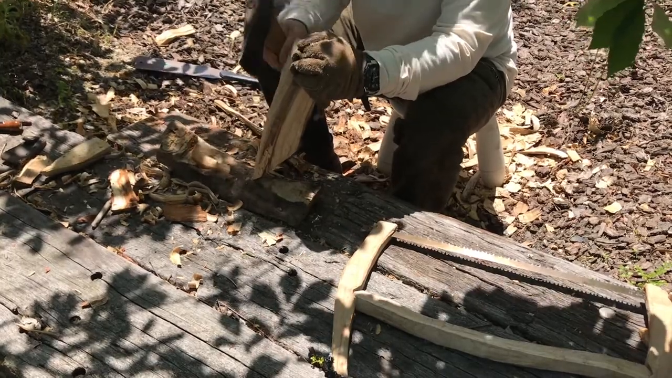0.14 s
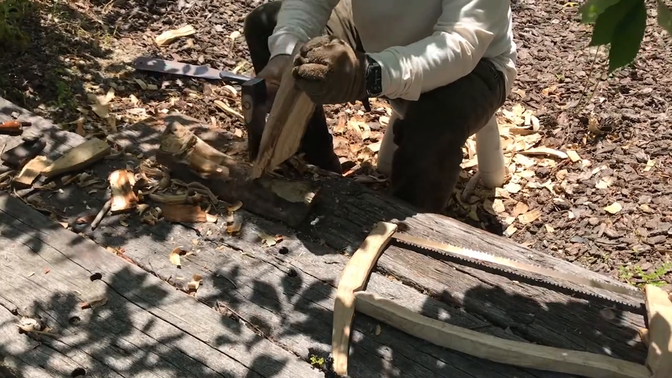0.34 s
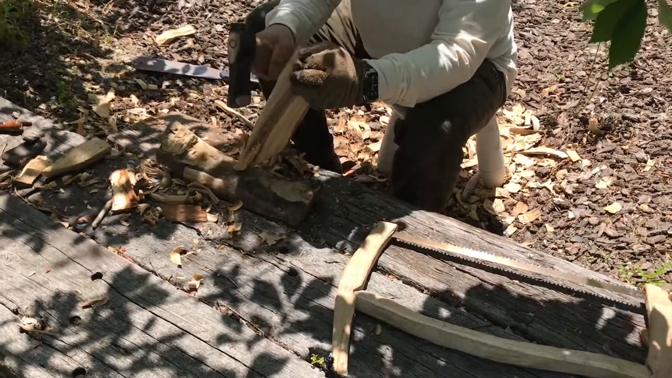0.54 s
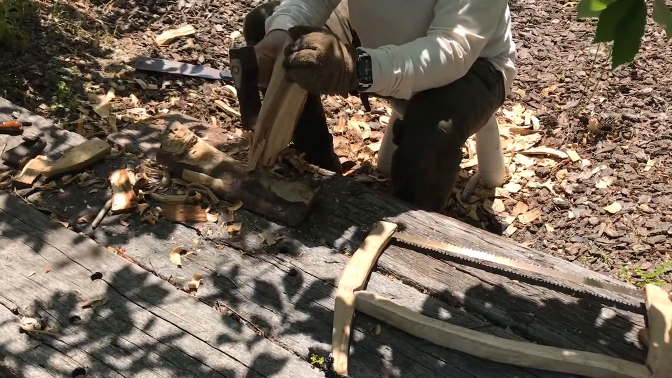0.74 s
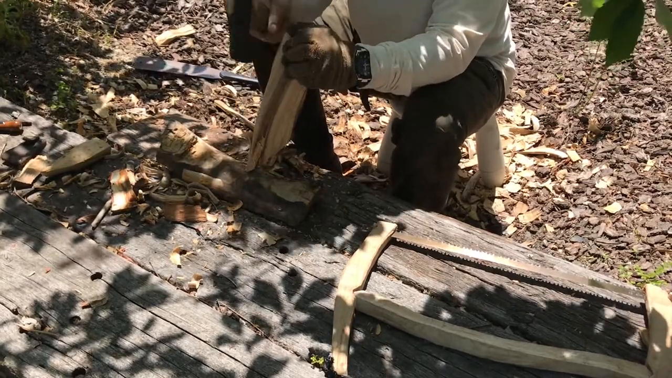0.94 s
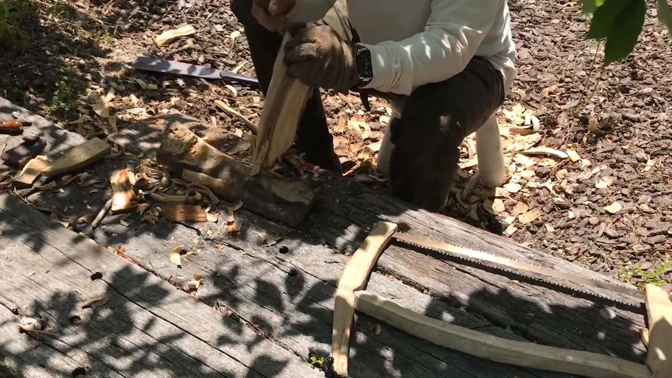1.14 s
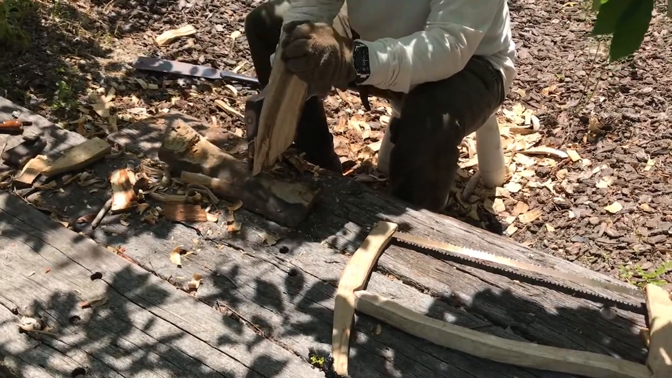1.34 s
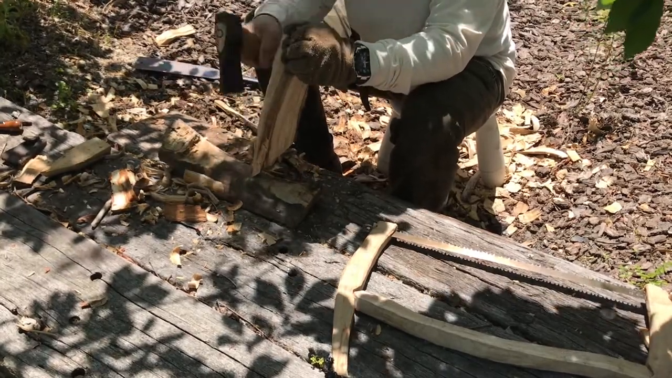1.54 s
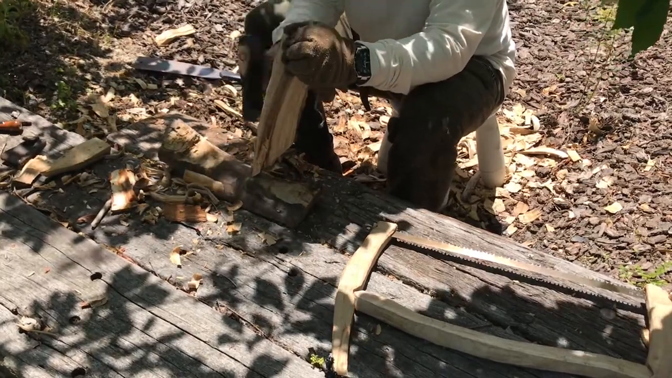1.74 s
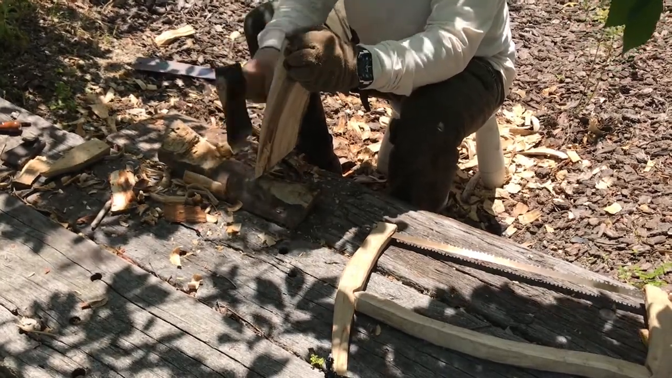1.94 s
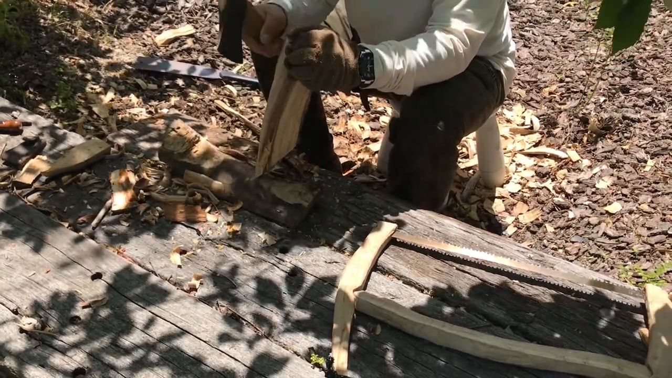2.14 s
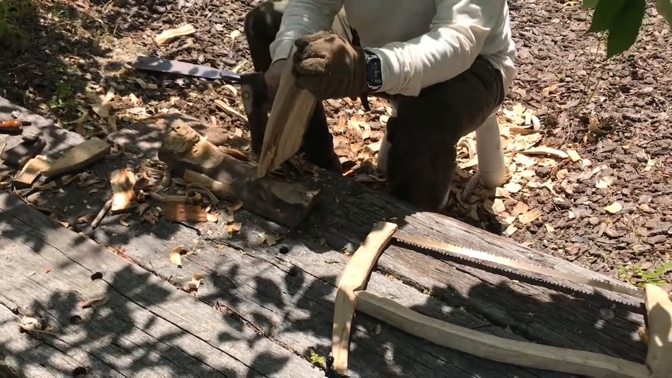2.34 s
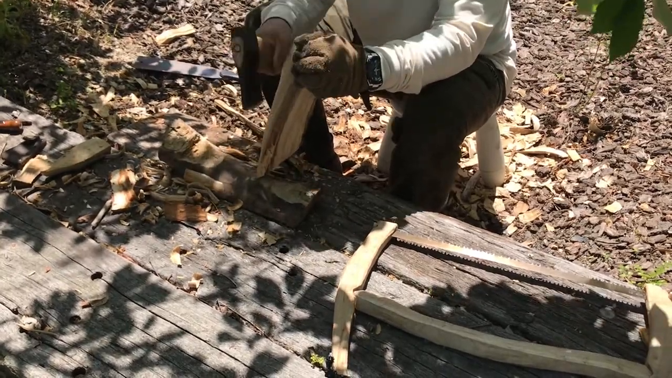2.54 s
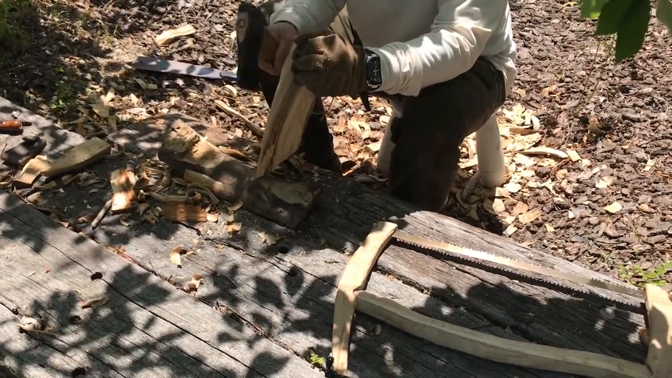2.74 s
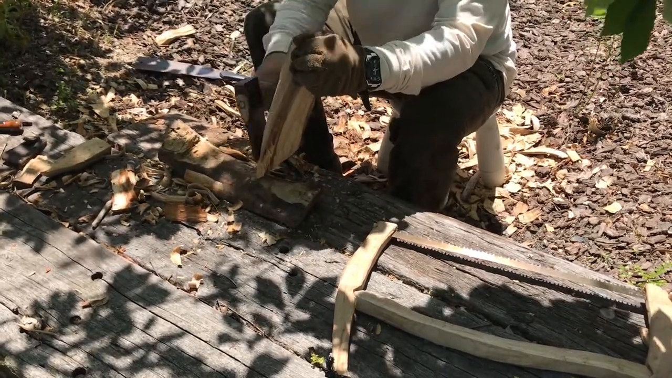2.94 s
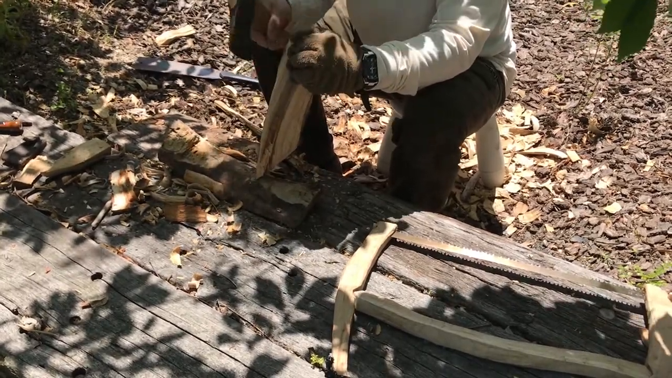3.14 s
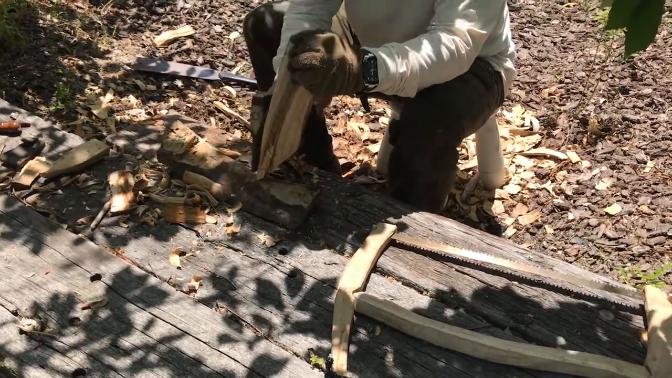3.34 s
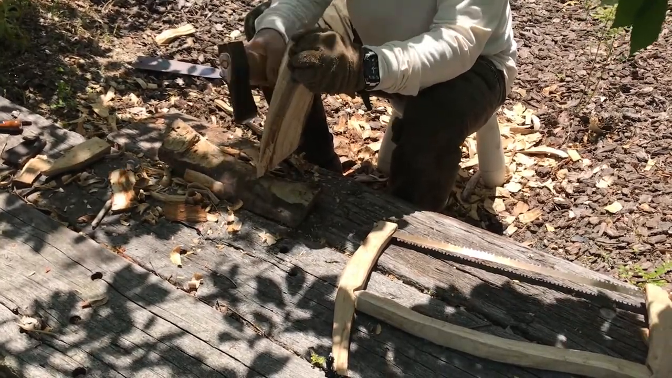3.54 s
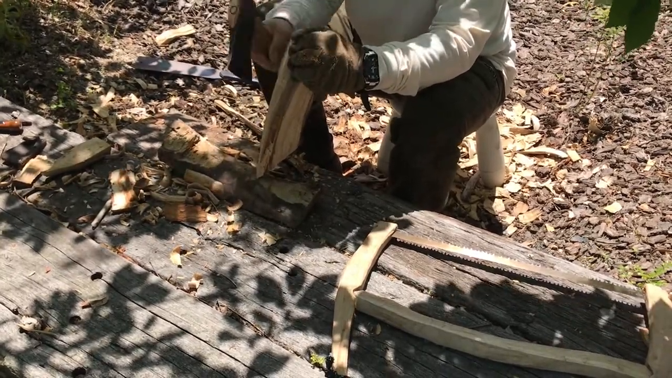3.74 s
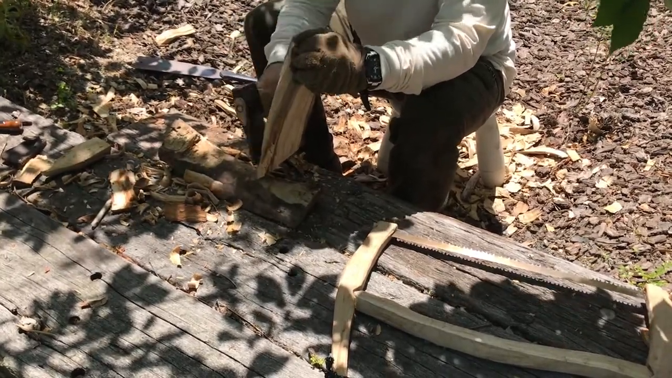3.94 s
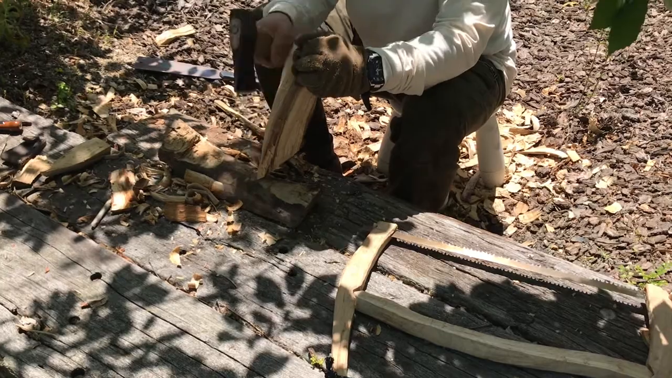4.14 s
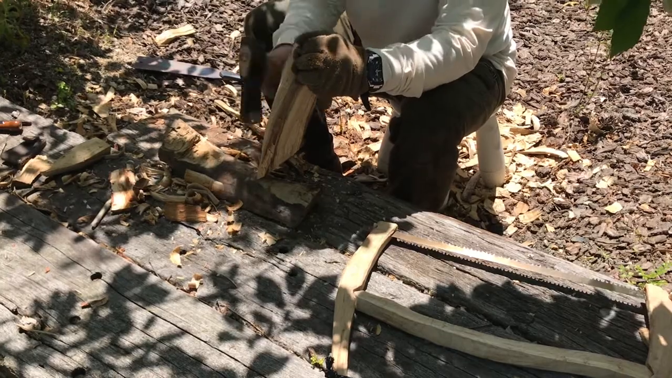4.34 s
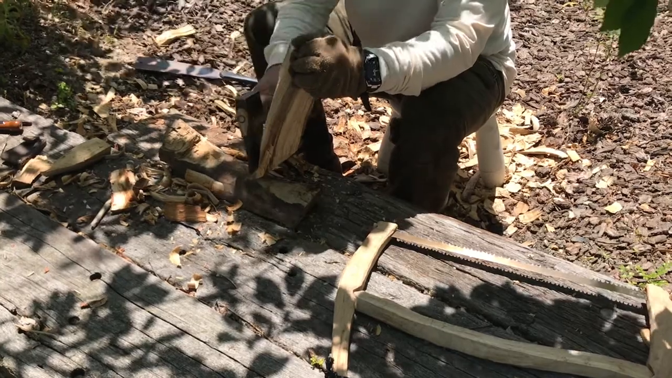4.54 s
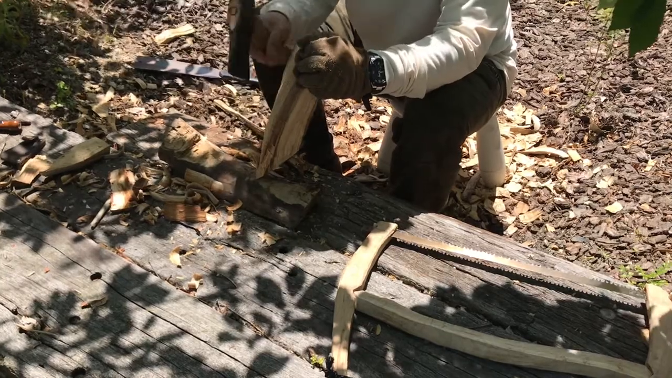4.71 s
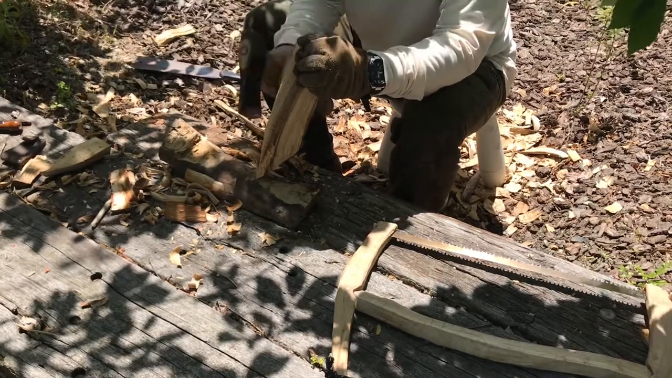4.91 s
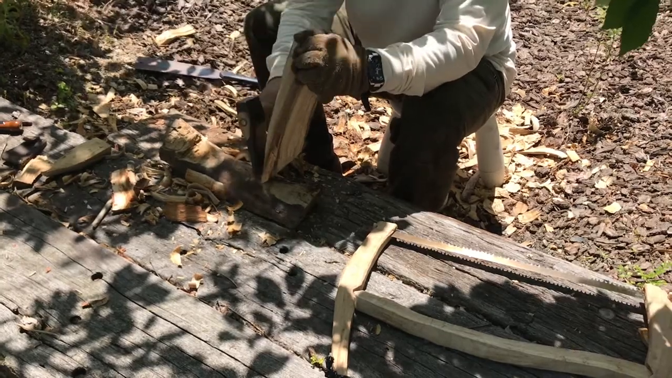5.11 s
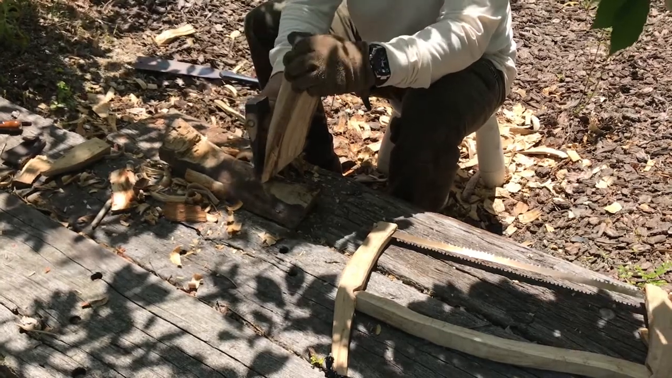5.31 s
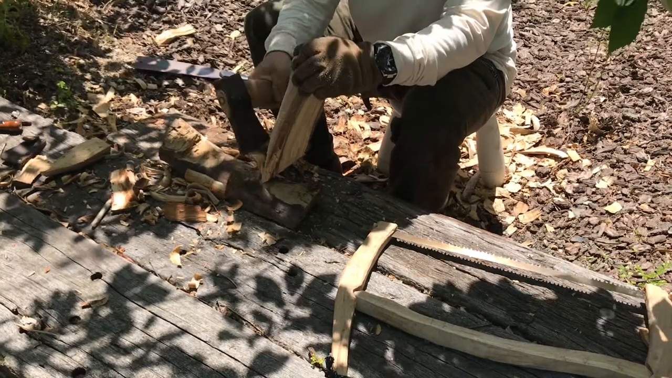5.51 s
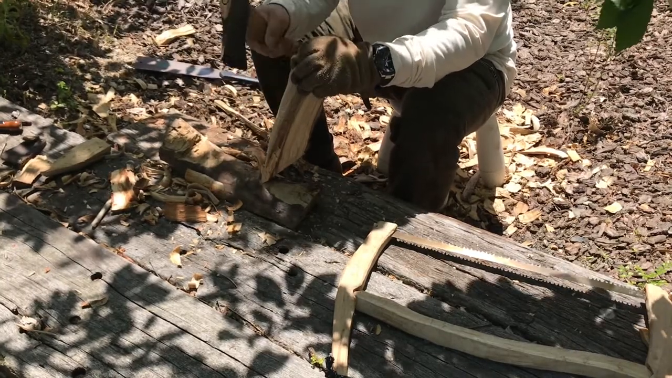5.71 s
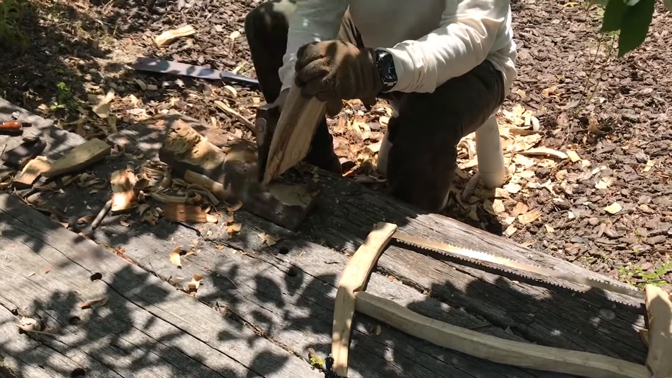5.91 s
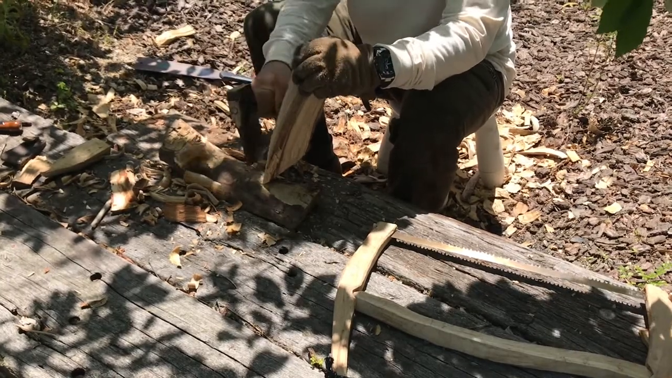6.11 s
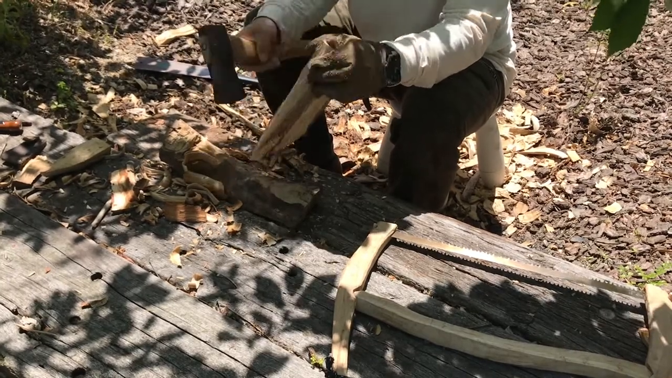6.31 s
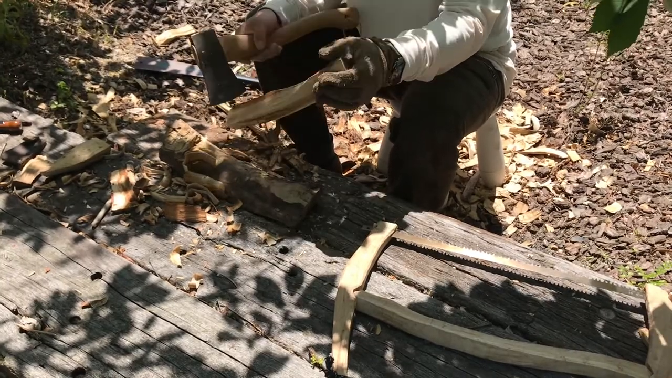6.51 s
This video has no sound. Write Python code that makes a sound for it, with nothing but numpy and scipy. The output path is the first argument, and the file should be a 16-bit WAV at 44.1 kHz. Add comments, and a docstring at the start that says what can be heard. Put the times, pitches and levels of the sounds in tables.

```python
"""Outdoors, one microphone close to a chopping block, where a hatchet shapes an upright billet of wood.
A faint low rumble and hiss lie under it from the start. In each of ten chops the blade bites and the
billet rings, fibres tear along the grain, a splinter snaps off, and the blow thuds into the block.
From the first chop on, a small bird gives short hoarse calls and dry chips rustle on the ground.
The ground throws each chop back at once; the trees answer a little later."""
import sys
import numpy as np
from scipy import signal
from scipy.fft import rfft, irfft
from scipy.io import wavfile
from scipy.ndimage import uniform_filter1d

SR = 44100
rng = np.random.default_rng(int(sys.argv[2]) if len(sys.argv) > 2 else 0)


def file_out(sig):
    """Save sig as 16-bit WAV at sys.argv[1]."""
    # one column per channel
    cols = np.atleast_2d(sig).T
    # limit, then scale
    lim = np.clip(cols, -1, 1)
    pcm = np.round(lim * 32767).astype(np.int16)
    wavfile.write(sys.argv[1], SR, pcm)


N = 289296

# spectrum of the open air: freq_hz, level_db
AIR_SPECTRUM = [(15, -29), (25, -5), (76, -1.5), (175, -9.5), (249, -12), (439, -23), (734, -24.5),
                (1290, -27.5), (1400, -28.5), (3080, -39.5), (5730, -46), (7110, -44), (7710, -51.5),
                (14800, -51), (16000, -53.5)]
# one row per chop. The bite: start_s, ring_db, place_hz (favoured by the striking place), cut_db;
# the splinter: snap_delay_s, snap_db, snap_length_s, splinter_hz, tilt_db_per_octave;
# the landing: landing_delay_s, jolt_db, jolt_hz, thud_db, thud_hz
CHOPS = [ (0.235, -23.5, 1123, -26, 0.013, -27, 0.00904, 13200, 1, 0.014, -39, 900, -27.5, 215),
         (1.315, -35.5, 2060, -35, .0055, -18, 0.00208, 12600, -3.5, 0.02825, -10, 970, -12.5, 225),
         (1.7991, -20.5, 1953, -32, .0185, -14.5, 0.00216, 5120, -2.5, 0.0444, -25, 900, -18, 192.9),
         (2.2954, -20.5, 2052, -26.5, .003, -34.5, 0.01773, 3000, -2, 0.00468, -30, 1290, -31, 195),
         (2.8268, -30.5, 1150, -29.5, 0.00575, -29.5, 0.01204, 9700, -2, 0.01057, -30, 1100, -26.5, 155),
         (3.3381, -29.5, 1131, -36, 0.01734, -23.5, 0.009, 4470, -0.93, 0.02053, -36.5, 2300, -24.5, 166.8),
         (3.8520, -28.5, 1600, -33.5, .006, -33.5, 0.0054, 12000, 1, .0095, -37, 1130, -23, 140.2),
         (4.4103, -30, 1620, -36, .004, -22.5, 0.00504, 12600, -1, 0.00633, -29.5, 1188, -19, 361.5),
         (4.9823, -19.5, 1915, -24.5, 0.0072, -11.5, 0.00195, 14450, 0, 0.0084, -18.5, 1674, -18, 209),
         (5.929, -17, 1870, -26.5, 0.00972, -19, 0.00332, 13200, 0.5, 0.01183, -21, 1166, -13.5, 205.5)]
# the billet rebounds, shifts or is set down on the block: start_s, jolt_db, jolt_hz, thud_db, thud_hz
BUMPS = [(.465, -37, 729, -33, 237.6), (1.8285, -28, 1200, -28, 321), (2.312, -42, 1090, -31.5, 163.5),
         (2.867, -50.5, 866, -35.5, 144), (3.894, -51, 1610, -35.5, 127), (6.0183, -52, 1360, -64, 300),
         (6.221, -46, 1400, -61.5, 303)]
# modes of the billet and of the block: pitch_hz, level_db, t60_s
BILLET_MODES = [(404.2, -6.5, 0.016), (690, -11.5, 0.026), (967.4, -5, 0.022), (1090, -7, 0.025),
                (1240, -0.5, 0.025), (1464.3, -5.5, 0.025), (1602, -9, 0.039), (1753, -0.5, 0.016),
                (1996, 0, 0.017), (2185, -4, 0.017), (2370, -17, 0.018), (3052.6, -9.5, 0.046),
                (3267, -17, 0.022), (3600, -13, 0.039), (4090, -25.5, .035), (4940, -21.5, 0.025)]
BLOCK_MODES = [(151.2, 0, 0.057), (221, -0.5, 0.059), (313.4, -7, 0.06), (384.2, 1.5, 0.041),
               (441.4, 3, 0.015), (585, -11.5, 0.065), (742.1, -14, 0.063), (1020, -22, .03)]
# spectrum of tearing wood fibres: freq_hz, level_db
FIBRE_SPECTRUM = [(300, -13), (900, 2), (1700, -4.5), (2300, 7), (2650, -2.5), (3050, 6), (3800, -2.5),
                  (5200, 1), (7500, -3), (8800, -0.5), (10400, -4.5), (13500, 0), (16000, -8)]
# the bird's calls: start_s, relative_level_db, length_s
BIRD_CALLS = [(0.257, -44.5, 0.0682), (0.804, -66, 0.079), (1.088, -54.5, 0.01945), (2.454, -56, 0.057),
              (2.625, -51, 0.0156), (3.215, -44.5, 0.0635), (4.014, -52, 0.01865), (4.793, -45.5, 0.064),
              (5.254, -64, 0.074), (5.634, -54, 0.0155), (6.236, -43, 0.0684)]
# contour of one call: share_of_length, pitch_hz, level_db
CALL_SHAPE = [(0, 3150, -17.5), (.12, 3981, -13.5), (.26, 5200, -8), (.42, 4450, -3), (.62, 3875, -4),
              (.8, 3564, 1), (1, 3180, -17)]
# the clearest chips landing and shifting, plus the dry tick as the billet rebounds at 3.894 s: start_s,
# level_db, length_s
CHIPS = [(.413, -55.5, 0.00436), (0.456, -56.5, 0.0076), (.504, -61, 0.0041), (0.522, -68, 0.054),
         (0.619, -66, 0.0587), (.695, -64, 0.0082), (1.046, -69.5, .047), (1.359, -55, .03),
         (1.895, -57, 0.0164), (2.047, -70, .06), (3.894, -59, 0.0143), (5.441, -64.5, 0.0356),
         (6.056, -56.5, 0.0054)]
# spectrum of dry chips: freq_hz, level_db
CHIP_SPECTRUM = [(300, -18.5), (1500, 2.5), (4000, 0.5), (7500, -7.5), (8900, -1), (10500, -12.5),
                 (13200, -2.5), (15500, -10)]
# spectrum of the echo from the trees: freq_hz, level_db
TREE_SPECTRUM = [(60, -11.5), (150, -4), (400, 0), (900, -20.5), (3500, 1), (7000, -3.5), (15000, -16.5)]

RING_S = np.arange(SR // 5) / SR  # time since a blow


def undb(db):
    """Decibels to gain."""
    return 10 ** (np.asarray(db) / 20)


def unit(x, seconds):
    """Scale to rms 1 over the first seconds."""
    return x / np.sqrt(np.mean(x[:int(seconds * SR) + 1] ** 2))


def add(track, start_s, sound):
    """Mix a sound in at its start time."""
    start = max(int(start_s * SR), 0)
    track[start:start + len(sound)] += sound[:N - start]


def colour(x, points, tilt_db=0):
    """Causal filter through (freq_hz, level_db) points, tilted by tilt_db per octave."""
    size = 8192
    octave = np.log2(np.maximum(np.arange(size // 2 + 1), 1) * SR / size)
    hz, db = np.transpose(sorted(points))
    curve_db = np.interp(octave, np.log2(hz), db) + tilt_db * (octave - octave.mean())
    cepstrum = irfft(np.log(undb(curve_db)))
    cepstrum[1:size // 2] *= 2  # fold to minimum phase
    cepstrum[size // 2 + 1:] = 0
    return signal.fftconvolve(x, irfft(np.exp(rfft(cepstrum))))[:len(x)]


def low_cut(x, hz, order):
    """Butterworth high-pass."""
    return signal.sosfilt(signal.butter(order, hz, "high", fs=SR, output="sos"), x)


def walk(rate, size):
    """Smooth random wander that changes about rate times a second; spread 1."""
    step = max(int(SR / rate), 1)
    held = np.repeat(rng.standard_normal(size // step + 1), step)
    return np.sqrt(3 / 2) * uniform_filter1d(held, step)[:size]


def air(level_db=-47.66, drone_hz=52, drone_db=-53):
    """Far off, a rumble and a low drone waver under a steady faint hiss."""
    noise = colour(rng.standard_normal(N), AIR_SPECTRUM)
    noise = unit(low_cut(noise, hz=37.7, order=6), N / SR)
    rumble = signal.sosfiltfilt(signal.butter(2, 250, fs=SR, output="sos"), noise)
    phase = 2 * np.pi * np.cumsum(drone_hz + walk(6.6, N)) / SR
    drone = np.sqrt(2) * np.sin(phase) * undb(2.5 * walk(3.3, N))
    waver = undb(4.0 * walk(4.3, N)) - 1
    return undb(level_db) * (noise + rumble * waver) + undb(drone_db) * drone


def hatchet():
    """Each chop bites, cuts down the grain, snaps off a splinter and drives the billet onto the block."""
    out = np.zeros(N)
    for (start_s, ring_db, place_hz, cut_db, snap_delay_s, snap_db, snap_length_s, splinter_hz, tilt_db,
         landing_delay_s, *impact) in CHOPS:
        bite = billet(ring_db, contact_hz=3380, place_hz=place_hz)  # the steel edge is a hard contact
        add(out, start_s, bite + cut(cut_db, landing_delay_s))
        add(out, start_s, block(db=-39, place_hz=373))  # the bite already presses on the block
        add(out, start_s + snap_delay_s, splinter(snap_db, snap_length_s, splinter_hz, tilt_db))
        add(out, start_s + landing_delay_s, landing(*impact))
    for start_s, *impact in BUMPS:
        add(out, start_s, landing(*impact))
    return out


def strike(modes, contact_hz, place_hz, place_db, detune=.008, scatter_db=1.2):
    """Struck wood: modes above contact_hz stay quiet; the striking place lifts those near place_hz."""
    hz, db, t60 = np.transpose(modes)
    chance = rng.standard_normal((len(hz), 2))  # no two blows ring quite alike
    hz = hz * (1 + detune * chance[:, 0])
    lift_db = place_db * np.exp(-(np.log2(hz / place_hz) / 0.2) ** 2)
    gain = undb(db + scatter_db * chance[:, 1] + lift_db) / np.hypot(1, (hz / contact_hz) ** 4)
    # neighbouring modes start in opposite directions, so the sound swells as the wave crosses the wood
    gain *= (-1) ** np.arange(len(hz))
    decay = np.exp(-np.log(1000) * np.outer(1 / t60, RING_S))
    return gain @ (np.sin(2 * np.pi * np.outer(hz, RING_S)) * decay)


def billet(db, contact_hz, place_hz):
    """The held piece rings briefly."""
    ring = strike(BILLET_MODES, contact_hz, place_hz, place_db=7.5)
    ring *= 1 - np.exp(-RING_S * contact_hz / .7)  # a soft contact takes longer to build
    return undb(db) * unit(ring, 0.011)


def crackle(length_s, release_s, spread_db):
    """Dense tiny snaps of uneven size that last a while and die away."""
    snaps = rng.standard_normal(len(RING_S)) * undb(spread_db * walk(3000, len(RING_S)))
    return snaps * np.exp(-np.maximum(RING_S - length_s, 0) / release_s)


def cut(db, travel_s, release_s=.004):
    """The edge crunches in, then fibres tear along the grain for part of its way down."""
    length_s = .75 * travel_s
    entry = undb(1.5 * np.exp(-RING_S / .003))  # loudest as the edge breaks the surface
    snaps = crackle(length_s, release_s, spread_db=5.5) * entry
    return undb(db) * unit(colour(snaps, FIBRE_SPECTRUM, tilt_db=-3.5), length_s + release_s)


def block(db, place_hz):
    """The blow carries through into the heavy block, which is too small to radiate deep bass."""
    ring = strike(BLOCK_MODES, contact_hz=2.4 * place_hz, place_hz=place_hz, place_db=5.5)
    return undb(db) * unit(low_cut(ring, hz=75, order=2), 0.021)


def splinter(db, length_s, splinter_hz, tilt_db):
    """A splinter peels off; its resonance colours the crackle, most of all in a short snap."""
    snaps = crackle(length_s, release_s=0.34 * length_s, spread_db=8.5)
    snaps = colour(snaps, FIBRE_SPECTRUM, tilt_db)
    ring = signal.lfilter(*signal.iirpeak(splinter_hz, Q=2.6, fs=SR), snaps)
    ring_gain = 0.49 + 1.7 * np.exp(-length_s / 0.0018)
    return undb(db) * unit(snaps + ring_gain * ring, 1.1 * length_s)


def landing(jolt_db, jolt_hz, thud_db, thud_hz, crush_s=.0015):
    """Billet meets block: both ring, and a little end grain is crushed."""
    snaps = crackle(crush_s, release_s=0.0005, spread_db=3.5)
    crush = undb(jolt_db - 15.5) * unit(colour(snaps, FIBRE_SPECTRUM, tilt_db=-3), crush_s)
    jolt = billet(jolt_db, contact_hz=0.874 * jolt_hz, place_hz=jolt_hz)
    return jolt + block(thud_db, thud_hz) + crush


def bird():
    """Each chirp flicks up and slides down; uneven flutter in the throat spreads a rasp around it."""
    out = np.zeros(N)
    share, shape_hz, shape_db = np.transpose(CALL_SHAPE)
    for start_s, db, length_s in BIRD_CALLS:
        hoarse = 1.1 * np.exp(-length_s / .12)  # the shorter the call, the hoarser
        size = int(length_s * SR)
        along = np.linspace(0, 1, size)
        hz = np.interp(along, share, shape_hz) * (1 + .13 * hoarse * walk(1200, size))
        phase = 2 * np.pi * np.cumsum(hz) / SR
        whistle = np.sin(phase) * (1 + 0.8 * walk(500, size)) + 0.098 * np.sin(2 * phase)
        rasp = 0.75 * walk(1500, size) * np.sin(1.27 * phase)
        rasp += 0.37 * walk(900, size) * np.sin(.82 * phase)
        envelope = undb(np.interp(along, share, shape_db))
        add(out, start_s, undb(db) * unit((whistle + hoarse * rasp) * envelope, length_s))
    return out


def chip(db, length_s):
    """A loose dry chip ticks or rustles."""
    swell = 1 - np.exp(-RING_S / (0.136 * length_s))
    snaps = crackle(length_s, release_s=0.565 * length_s, spread_db=6.0)
    return undb(db) * unit(colour(swell * snaps, CHIP_SPECTRUM), 1.95 * length_s)


def chips(crumbs_per_chop=3):
    """A few chips land clearly, a dry tick comes with one rebound of the billet, and every chop scatters crumbs
    that fall soon after it."""
    out = np.zeros(N)
    for start_s, db, length_s in CHIPS:
        add(out, start_s, chip(db, length_s))
    for start_s, *_ in CHOPS:
        for flight_s in rng.uniform(0.029, 0.11, size=crumbs_per_chop):
            add(out, start_s + flight_s, chip(db=rng.normal(-72, 2.5), length_s=.014))
    return out


def echo(x, t60_s, build_s, spectrum):
    """Diffuse reflections build up at the microphone and fade."""
    t = np.arange(SR) / SR
    swell = 1 - np.exp(-(t / build_s) ** 2)
    tail = rng.standard_normal(SR) * np.exp(-np.log(1000) * t / t60_s) * swell
    return signal.fftconvolve(x, colour(tail / np.linalg.norm(tail), spectrum))[:N]


def scene():
    """At the microphone: the ground scatters each chop, leaves blur the bird, trees answer both."""
    wood = hatchet() + chips()
    calls = bird()
    ground = echo(wood, t60_s=0.086, build_s=0.0023,
                  spectrum=[(150, -16), (600, -18), (1500, -19), (3500, -10.5), (8000, -9.5),
                            (15000, -13.5)])
    leaves = echo(calls, t60_s=0.07, build_s=0.00061, spectrum=[(2000, -4), (8000, -7)])
    trees = echo(undb(-26) * wood + undb(-16.5) * calls, t60_s=0.31, build_s=.02, spectrum=TREE_SPECTRUM)
    return (wood + undb(-9) * calls + ground + leaves + trees + air())[None]


def record(dry):
    """The recorder clips peaks at full scale and cuts the top above 15.9 kHz."""
    top_cut = signal.ellip(10, .2, 70, 15900, fs=SR, output="sos")
    return signal.sosfilt(top_cut, np.clip(dry, -1, 1))


dry = scene()
out = record(dry)
file_out(out)
```